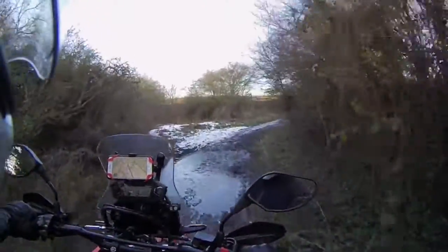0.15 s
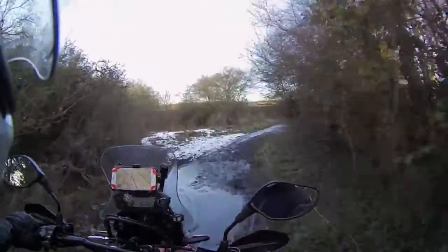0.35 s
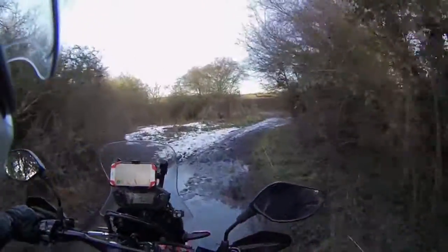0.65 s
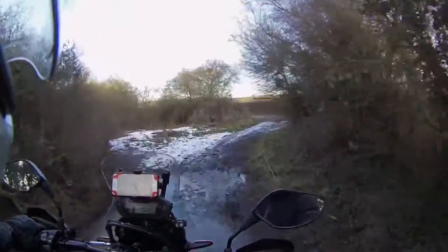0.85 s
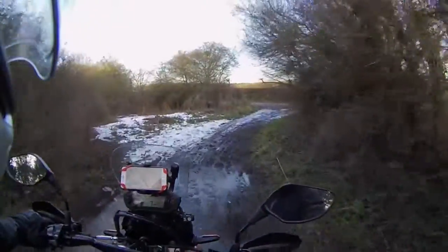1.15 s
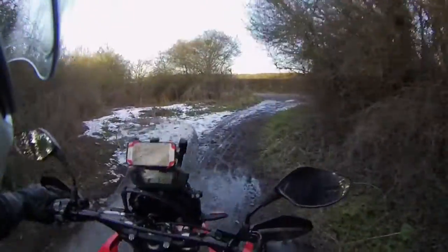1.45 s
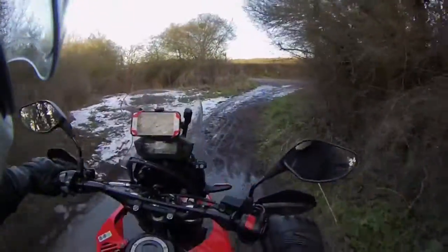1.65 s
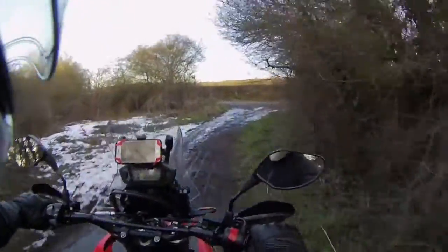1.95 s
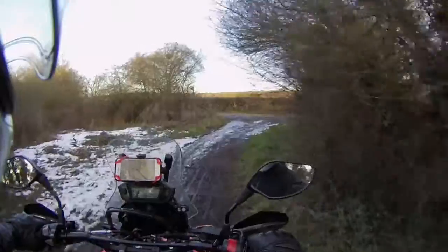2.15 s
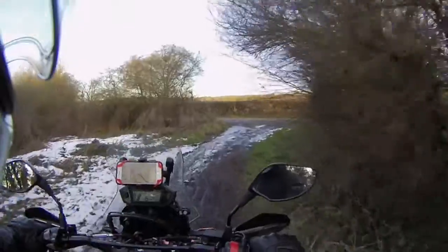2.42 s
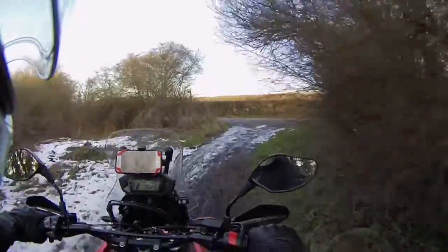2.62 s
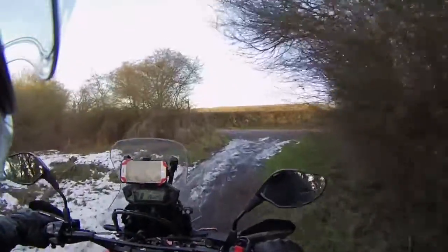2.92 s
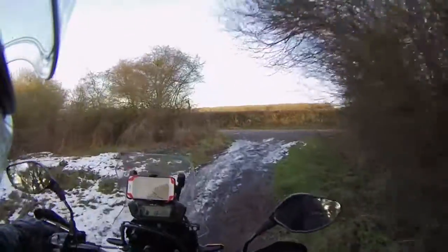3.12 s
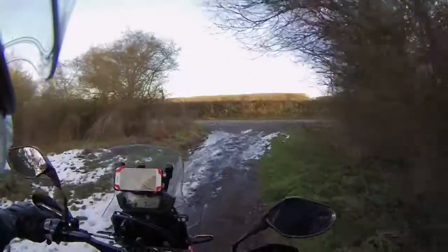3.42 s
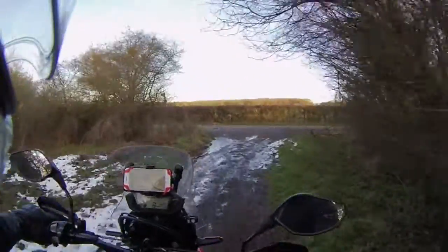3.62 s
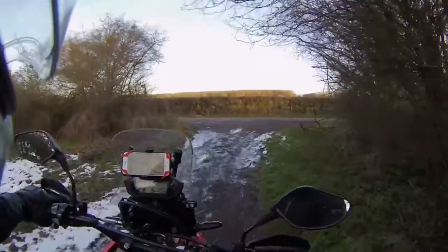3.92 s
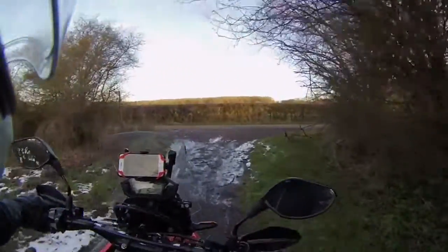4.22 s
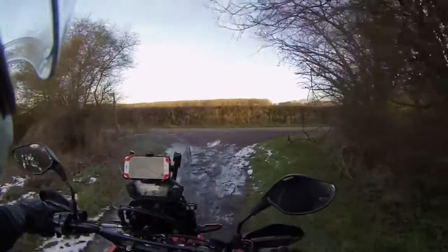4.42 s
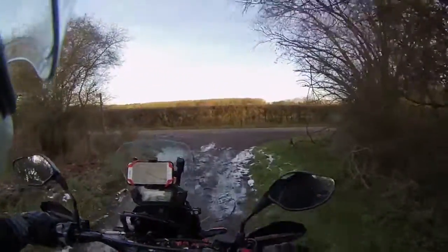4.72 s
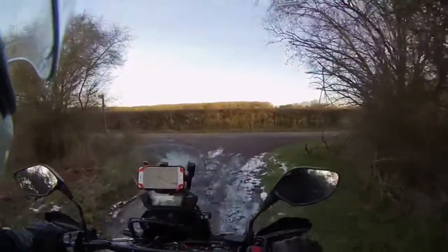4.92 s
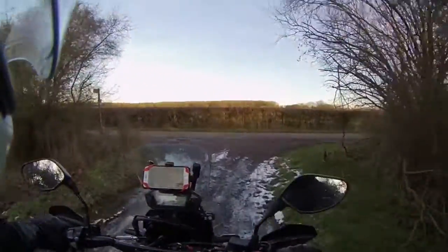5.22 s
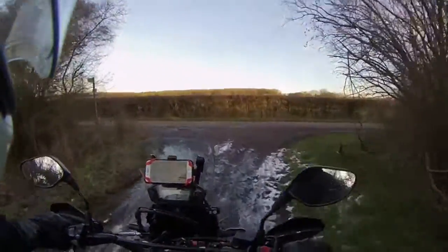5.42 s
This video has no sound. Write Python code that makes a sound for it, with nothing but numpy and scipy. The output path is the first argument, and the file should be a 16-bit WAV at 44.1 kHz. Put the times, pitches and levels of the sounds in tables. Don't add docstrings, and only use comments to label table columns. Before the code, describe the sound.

A small single-cylinder motorcycle creeps along a wet, slushy outdoor track, heard very close from a camera on the rider's helmet. It starts with a low, pulling hum, then by 0.8 s the revs sink to a lumpy putter with clattering valves and soft exhaust thuds. From 0.6 to 2 s short wet splashes crackle over a steady tyre hiss, with knocks on the mount; a heavy wind thump hits near 1.5 s. The throttle opens about 1.8 s, the intake honks, gears whine and revs peak near 2.2 s, then ease. Around 3-3.6 s the engine drops to near-idle amid a sharp rattle, bright grit ticks and wind bumps, while spray thins. At 4.1 s it honks and pulls again, holding until about 5 s. A splash at 5 s and hard ticks at 5.2 and 5.4 s accompany falling revs. A very faint high electronic whistle persists.

```python
import sys
import numpy as np
from scipy import signal
from scipy.fft import rfft, irfft, next_fast_len
from scipy.io import wavfile
from scipy.ndimage import uniform_filter1d

SR = 44100
rng = np.random.default_rng(int(sys.argv[2]) if len(sys.argv) > 2 else 0)


def decibels_to_gain(level_db):
    exponent = np.asarray(level_db, float) / 20
    return 10 ** exponent


def generate_wav(sig):
    pcm = np.round(np.clip(np.atleast_2d(sig).T, -1, 1) * 32767).astype(np.int16)
    wavfile.write(sys.argv[1], SR, pcm)


N = 245195
T = np.arange(N) / SR


def level(x, db):
    return x * decibels_to_gain(db) / np.sqrt(np.mean(x ** 2))


def filtered(x, gain):
    size = next_fast_len(N + SR // 2)
    hz = np.arange(size // 2 + 1) * SR / size + 1e-3
    return irfft(rfft(x, size) * gain(hz), size)[:N]


def slope(points):
    hz, db = np.transpose(points)
    return lambda f: decibels_to_gain(np.interp(np.log(f), np.log(hz), db))


def steep(modes):
    return lambda f: np.sqrt(sum(decibels_to_gain(2 * db) / (1 + (2 * (f - hz) / w) ** 4) for hz, w, db in modes))


def ringing(modes):
    def gain(f):
        return sum((-1) ** k * decibels_to_gain(db) / (1 + 1j * (f / hz - hz / f) * hz / w)
                   for k, (hz, w, db) in enumerate(modes))
    return gain


def walk(rate):
    k = int(SR / rate)
    steps = np.repeat(rng.standard_normal(N // k + 1), k)
    return 1.3 * uniform_filter1d(uniform_filter1d(steps, k), k)[:N]


def pings(x):
    z = signal.stft(x, SR, nperseg=1024)[2]
    luck = rng.standard_normal(z.shape)
    luck = uniform_filter1d(uniform_filter1d(luck, size=2, axis=0), size=2, axis=1)
    spread_db = 2.5
    return signal.istft(z * decibels_to_gain(2 * spread_db * luck), SR, nperseg=1024)[1][:N]


def add(out, s, shape):
    i = int(s * SR)
    out[i:i + len(shape)] += shape[:N - i]


def curves(table):
    s, *columns = np.transpose(table)
    return [np.interp(T, s, c) for c in columns]


# pitch in Hz, level in dB.
WHISTLE_TONES = [(9543, -77), (12724, -85)]


def whistle():
    return sum(decibels_to_gain(db) * np.sin(2 * np.pi * hz * T) for hz, db in WHISTLE_TONES)


# time in seconds, gust in dB.
GUST = [(0, -43), (.3, -50), (.75, -52), (1.02, -18), (1.33, -43), (1.47, -8), (1.9, -59), (2.04, -22),
        (2.21, -52), (2.7, -59), (3.2, -44.5), (3.8, -39), (4.12, -41), (4.33, -43), (4.52, -47),
        (4.77, -47), (4.94, -63), (5.2, -44)]
# frequency in Hz, level in dB.
WIND_TONE = [(4, -3), (11, -1.5), (28, -4), (60, -9), (120, -21.5), (250, -24.5), (500, -41.5), (1000, -39),
             (3000, -47.5)]
# time in seconds, dip
# in dB, dip length in ms, share that rebounds.
BUFFETS = [
    (1.486, -19.3, 2.5, .5),
    (3.077, -33, 3, .4),
    (.981, -36, 3, .2),
    (2.73, -28, 6, .3),
    (2.87, -31, 6, .9),
    (3.209, -30, 4, .3),
]
# time in seconds, push in dB, length in ms (negative: it pulls).
PUSHES = [(0.656, -36.5, 5), (0.834, -36, 16), (.94, -39, 4), (.966, -39, 4), (1.0, -40, 2),
          (1.031, -34, 5), (1.07, -38, 5), (1.17, -39, -6), (1.28, -38.5, 14), (1.622, -36, 14.5),
          (1.695, -34.5, 3.5), (1.725, -45, 20), (1.795, -32.5, 4.5), (1.823, -37, 7), (3.224, -28.5, 9),
          (3.35, -38, 8), (3.445, -34.5, 7), (3.53, -43, 11), (3.589, -32.5, 8), (3.61, -27.5, 10.5),
          (3.684, -39, 20), (3.795, -32.5, 22), (3.885, -42, 9), (3.913, -41, 14), (4.013, -40, 3.5),
          (4.169, -30.5, 7.5), (5.313, -39, 5.5), (5.333, -34.5, 5), (5.397, -35.5, 11)]


def wind(revs_hz):
    gust_db, = curves(GUST)
    flutter_db = -60 + 0.13 * (gust_db - gust_db.mean()) + 0.22 * (revs_hz - BODY_HZ)
    tone, split_hz = slope(WIND_TONE), 55
    deep = rng.standard_normal(N) * decibels_to_gain(2.3 * walk(5.8))
    deep = filtered(deep, lambda f: tone(f) / (1 + (f / split_hz) ** 4))
    upper = rng.standard_normal(N) * decibels_to_gain(1.4 * walk(22.04))
    upper = filtered(upper, lambda f: tone(f) / (1 + (split_hz / f) ** 4))
    out = decibels_to_gain(np.minimum(gust_db, -40)) * level(deep, -3.0) + decibels_to_gain(flutter_db) * level(upper, 5.7)
    t = np.arange(-1000, 4000) / SR
    for s, db, ms, rebound in BUFFETS:
        u = t * 1000 / ms
        dip = 1 / (1 + u ** 2) ** 1.5
        back = np.clip(u / 3.0, 0, None)
        add(out, s + t[0], decibels_to_gain(db) * (rebound * np.e * back * np.exp(-back) - dip))
    for s, db, ms in PUSHES:
        u = t * 1000 / abs(ms)
        push, pull = np.exp(-u ** 2), .6 * np.exp(-((u - 2.2) / 1.4) ** 2)
        add(out, s + t[0], decibels_to_gain(db) * np.sign(ms) * (push - pull))
    return out


# time
# in seconds, peak in dB, pitch in Hz, length in ms.
RATTLES = [(0.627, -47.5, 354, 7.1), (0.975, -45.5, 298, 7.5), (1.079, -46, 370, 17),
           (1.433, -39.5, 310, 5.7), (2.36, -47, 342, 6.1), (3.044, -36, 368, 11.7), (1.481, -43, 313, 5.6),
           (3.29, -50.5, 345, 10), (3.34, -52.5, 400, 8), (3.375, -51, 300, 8.9), (.842, -53, 450, 7),
           (1.392, -53, 420, 6.3), (2.067, -50, 330, 7), (3.99, -46.5, 356, 6), (4.093, -47.5, 360, 13),
           (4.381, -48, 385, 11)]
# multiple of the rattle pitch, level in dB, decay in seconds.
SHELL = [(.7, -6.5, 0.011), (.43, -4, .012), (.25, -4.5, 0.0165)]


def mount():
    out, t = np.zeros(N), np.arange(2000) / SR
    for s, db, hz, ms in RATTLES:
        contact = np.exp(-(t * 1000 / ms) ** 8)
        shove = 1.1 * (1 - np.exp(-t / .002))
        chatter = np.sin(2 * np.pi * hz * t) * np.exp(-t / .02)
        shell = sum(decibels_to_gain(g) * np.sin(2 * np.pi * k * hz * t) * np.exp(-t / fall) for k, g, fall in SHELL)
        add(out, s, decibels_to_gain(db) * (contact * (shove - chatter) - shell))
    return out


# time in seconds, peak in dB, pitch in Hz.
TICKS = [
    (5.2040, -40.5, 1150),
    (5.4302, -44, 1180),
    (1.572, -53, 1230),
    (.975, -53, 1250),
    (3.220, -48, 5000),
    (3.231, -51, 5600),
    (5.431, -53, 6000),
    (5.098, -53, 4950),
    (5.108, -55, 4850),
]
# multiple of the pitch, level in dB, 60 dB decay time in seconds.
TICK_MODES = [(.47, -2.5, .03), (.66, -7, .012), (.84, -4, .016), (1, -1, .03), (1.17, -5, .022),
              (1.36, -7, .018), (3.2, -11, .008)]


def grit():
    out, t = np.zeros(N), np.arange(2000) / SR
    for s, db, hz in TICKS:
        rings = sum(decibels_to_gain(g) * np.sin(2 * np.pi * k * hz * t) * decibels_to_gain(-60 * t / t60) for k, g, t60 in TICK_MODES)
        scrape = .27 * rng.standard_normal(len(t)) * np.exp(-t / .004)
        add(out, s, decibels_to_gain(db) * (1 - np.exp(-t / .0003)) * (rings + scrape))
    return out


# time in seconds, peak in dB, length in ms.
SPLASHES = [(0.6144, -48, 8.6), (0.8435, -46, 6.5), (0.8655, -46.5, 6.3), (0.9394, -50, 12),
            (0.9702, -49, 19), (1.0394, -50, 8.8), (1.0735, -53, 7.9), (1.1204, -65, 7.6),
            (1.2062, -47, 10), (1.3994, -48, 4.9), (1.525, -50, 20), (1.544, -53, 20), (1.557, -53, 10),
            (1.571, -45, 32), (1.6212, -51, 8.8), (1.865, -50, 42), (1.6985, -53, 8), (1.8003, -53, 8),
            (1.9405, -57, 7.3), (1.9659, -52, 9), (2.0188, -52, 9), (2.0872, -61, 8.1), (2.7194, -55, 8.3),
            (3.03, -55, 9.9), (3.055, -63, 6.3), (3.129, -58, 7.1), (3.22, -56, 9), (4.989, -49, 7.4)]


def splashes():
    out, t = np.zeros(N), np.arange(4000) / SR
    for s, db, ms in SPLASHES:
        add(out, s, decibels_to_gain(db - 6.0) * (1 - np.exp(-t / 0.00026)) * np.exp(-t * 1000 / ms))
    return out


# time in seconds, spray in dB.
SLUSH = [(0, -56), (.3, -57), (.74, -57), (1.0, -57), (1.35, -53), (1.62, -57), (1.92, -53.5),
         (2.25, -53.5), (2.9, -57), (3.36, -71.5), (3.75, -64), (4.1, -57.5), (4.55, -57.5), (5.1, -59),
         (5.56, -67.5)]


def slush_depth():
    return curves(SLUSH)[0]


# frequency in Hz, level in dB.
SPRAY_TONE = [(300, -1.5), (1000, -15.5), (2300, -9), (4000, -3.5), (6300, 3), (7500, -1), (10000, 2),
              (11000, -5.5), (14000, -9)]
# frequency in Hz, level in dB.
ROLL_TONE = [(200, -28), (450, 9.5), (900, -3), (1400, -4), (2300, 1), (3900, -6), (4800, -9.5), (6300, -9),
             (7500, -5), (9500, -3.5), (11000, -12.5), (14000, -12.5)]


def tyres(spray_db):
    flow = decibels_to_gain(spray_db + 0.76 * walk(16)) + splashes()
    drop_size = np.minimum(rng.exponential(size=N), 7)
    drops = rng.standard_normal(N) * decibels_to_gain(2.56 * drop_size)
    spray = level(pings(filtered(drops, slope(SPRAY_TONE))), 0.99)
    roll = filtered(rng.standard_normal(N) * decibels_to_gain(1.3 * walk(7.3)), slope(ROLL_TONE))
    return flow * spray + level(roll, -60.5)


# centre in Hz, width in Hz, level in dB.
GEARBOX = [(1480, 200, -3), (1950, 170, 0), (3680, 720, 0), (1500, 900, -8)]
# teeth per crank turn, level in dB.
TEETH = [
    (26, -63.5),
    (35, -61),
    (62, -71),
]


def gears(cycles, chance, whine_db, chirp_db):
    phase, count = cycles % 1, cycles.astype(int)
    turn = 2 * cycles - .012 * np.cos(2 * np.pi * (cycles - .15)) + .0022 * walk(120)
    bite = decibels_to_gain(1.5 * chance[3][count]) * np.exp(-((phase - .17) / .08) ** 2)
    second_bite = .3 * decibels_to_gain(3 * chance[2][count]) * np.exp(-((phase - .62) / .08) ** 2)
    whine = sum(decibels_to_gain(db + 2.5 * walk(9)) * np.sin(2 * np.pi * k * turn) for k, db in TEETH)
    whine = whine * (.6 + .8 * bite)
    primary_knocks = 70.5
    chirp = decibels_to_gain(-52) * np.sin(2 * np.pi * primary_knocks * turn) * (.12 + bite + second_bite)
    return filtered(decibels_to_gain(whine_db) * whine + decibels_to_gain(chirp_db) * chirp, steep(GEARBOX))


# centre in Hz, width in Hz, level in dB.
CASE = [(1420, 310, -10), (1954, 70, -5), (2860, 1350, -12.5), (3700, 510, -2.5), (4000, 240, -4),
        (4660, 890, -4.5), (5654, 375, 3), (6140, 370, 4.5), (6597, 410, 5), (8440, 440, -10.5),
        (9470, 570, -7), (11760, 440, -15)]


def valve_clatter(cycles, chance):
    phase, count = cycles % 1, cycles.astype(int)
    burn = decibels_to_gain(3.5 * chance[1][count]) * np.exp(-phase / 0.25)
    valves = decibels_to_gain(3.3 * chance[2][count]) * np.exp(-((phase + 0.33) % 1) / 0.11)
    knocks = (1 + 0.27 * burn + 0.55 * valves) * rng.standard_normal(N)
    return level(pings(filtered(knocks, steep(CASE))), 0.2)


def intake_honk(cycles, hz, chance, honk_db):
    late = cycles - .22
    since, stroke = late % 1 / hz, late.astype(int)
    box_hz = 257 + 3.4 * (hz - IDLE_HZ) + 4.0 * chance[1][stroke]
    t60_s = .075
    fall = decibels_to_gain(honk_db + 1.2 * chance[0][stroke] - 60 * since / t60_s)
    attack = 1 - np.exp(-since / .004)
    fade = np.clip(8 - 8 * (late % 1), 0, 1)
    return 1.15 * fall * attack * np.sin(2 * np.pi * box_hz * since) * fade


# centre in Hz, width in Hz, level in dB.
PIPE = [
    (185, 70, -13),
    (278, 45, 0),
    (460, 70, -12),
]


def exhaust_thud(cycles, hz, chance):
    phase, count = cycles % 1, cycles.astype(int)
    puff = decibels_to_gain(1.2 * chance[0][count]) * np.exp(-phase / hz / .0006)
    return level(filtered(puff - puff.mean(), ringing(PIPE)), 2.5)


# multiple of the firing rate, level in dB.
ORDERS = [(1, -8), (2, 0), (3, -21), (4, -21), (5, -21), (6, -21), (7, -22), (8, -28), (9, -28), (10, -27),
          (11, -27), (12, -34), (13, -34), (14, -35), (15, -31), (16, -29)]


def crank_hum(cycles):
    crank = np.sin(4 * np.pi * cycles + .3 * walk(14))
    firing = decibels_to_gain(ORDERS[0][1]) * np.sin(2 * np.pi * cycles)
    return np.sqrt(2) * decibels_to_gain(1.6 * walk(26)) * (crank + firing)


def exhaust_note(cycles):
    note = np.zeros(N)
    for k, db in ORDERS[2:]:
        wander = .4 * k ** 2 + .8 * walk(14)
        note += decibels_to_gain(db + 2.6 * walk(12)) * np.sin(2 * np.pi * round(k) * cycles + wander)
    return level(note, 6.2)


# time in seconds, firing rate in Hz.
REVS = [(0, 25.7), (.5, 24), (.82, 18.7), (1.15, 17.8), (1.62, 18.7), (1.84, 21.8), (2.08, 29.7),
        (2.19, 30.8), (2.52, 27.5), (2.77, 24.3), (2.94, 23), (3.08, 19.7), (3.55, 17.2), (3.93, 19.6),
        (4.28, 26.9), (4.55, 28.9), (4.98, 27.8), (5.31, 17.8)]
IDLE_HZ, BODY_HZ = 18, 24.5


def rev_curve():
    return curves(REVS)[0]


# start in seconds, end in seconds, first and last hum in dB.
CLUTCH = [
    (-.1, .69, -40.5, -42),
    (1.86, 2.97, -41.5, -39),
    (4.14, 5.2, -40.5, -40),
]
# time in seconds, intake honk in dB, bite of the primary gear in dB.
LOAD = [(0, -53, 0), (.33, -54, 1.5), (.5, -55, -4), (.8, -50, -13), (1.2, -52, -13), (1.6, -46, -13),
        (1.82, -44.5, -9), (1.93, -42, 4), (2.04, -47.5, -7), (2.18, -52, -12), (2.52, -54, -5),
        (2.73, -48.5, 4), (2.88, -50, -14), (3.7, -56, -13), (4.07, -40.5, -9), (4.17, -41.5, 2),
        (4.35, -42.5, 4), (4.5, -49.5, -5)]


def throttle(spray_db, revs_hz):
    hz = uniform_filter1d(revs_hz, SR // 16, mode="nearest")
    pull = uniform_filter1d(np.gradient(hz) * SR, SR // 8)
    opening = np.tanh(np.interp(T + .01, T, pull) / 12)
    up = hz - IDLE_HZ
    free_hum_db, clutch_s = -52, .07
    hum_db = np.full(N, float(free_hum_db))
    for start, end, first_db, last_db in CLUTCH:
        grip = np.clip(np.minimum(T - start, end - T) / clutch_s + .5, 0, 1)
        hum_db += grip * (np.interp(T, [start, end], [first_db, last_db]) - free_hum_db)
    hum_db -= 5.5 * ((hz - BODY_HZ) / 6) ** 2
    thud_db = -77.5 + 0.23 * up + 5.7 * walk(9)
    wet = decibels_to_gain(-5) * (decibels_to_gain(spray_db) + 1.57 * splashes())
    clatter_db = 20 * np.log10(decibels_to_gain(-62 + 0.82 * up) + wet)
    note_db = -77.5 + 1.2 * up
    whine_db = -5 + .45 * up - .5 * np.clip(opening, 0, 1)
    honk_db, chirp_db = curves(LOAD)
    honk_db -= 3 * np.clip(T - LOAD[-1][0], 0, 1)
    return hz, hum_db, thud_db, honk_db, clatter_db, note_db, whine_db, chirp_db


def engine(hz, hum_db, thud_db, honk_db, clatter_db, note_db, whine_db, chirp_db):
    cycles = np.cumsum(hz * (1.0034 + .003 * walk(14))) / SR + .78
    chance = rng.standard_normal((400, 4)).T
    out = decibels_to_gain(hum_db) * crank_hum(cycles) + decibels_to_gain(note_db) * exhaust_note(cycles)
    out += decibels_to_gain(thud_db) * exhaust_thud(cycles, hz, chance) + intake_honk(cycles, hz, chance, honk_db)
    out += decibels_to_gain(clatter_db) * valve_clatter(cycles, chance)
    return out + gears(cycles, chance, whine_db, chirp_db)


def scene():
    spray_db, revs_hz = slush_depth(), rev_curve()
    around = wind(revs_hz) + mount() + grit() + tyres(spray_db)
    return (around + engine(*throttle(spray_db, revs_hz)))[None]


def masking(x):
    hz, _, z = signal.stft(x, SR, nperseg=2048)
    power = uniform_filter1d(abs(z) ** 2, size=5, axis=0)
    usual = uniform_filter1d(uniform_filter1d(power, size=15, axis=1), size=15, axis=0)
    hiss = power[(hz > 3400) & (hz < 7000)].mean(axis=0)
    mask_db, dip_db, drop_db = -17, -4.5, -18
    weak = power < np.maximum(hiss * decibels_to_gain(2 * mask_db), usual * decibels_to_gain(2 * dip_db))
    weak &= ((hz > 1550) & (hz < 3300) | (hz > 12500))[:, None]
    return signal.istft(z * decibels_to_gain(drop_db * weak), SR, nperseg=2048)[1][:N]


def port(x):
    return filtered(x, lambda f: decibels_to_gain(-7 / (1 + ((f - 2300) / 170) ** 2)) / (1 + (5.9 / f) ** 4))


def roll_off(x):
    return signal.sosfilt(signal.butter(12, 13990, fs=SR, output="sos"), x)


def record(dry):
    offset = -.0152
    mix = masking(port(dry[0])) + whistle() + offset
    return roll_off(mix[None])


dry = scene()
out = record(dry)
generate_wav(out)
```